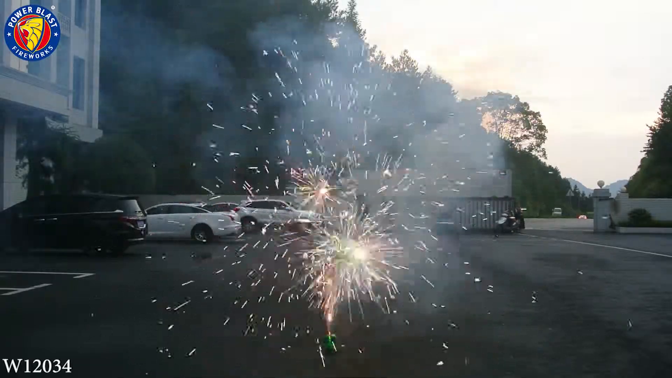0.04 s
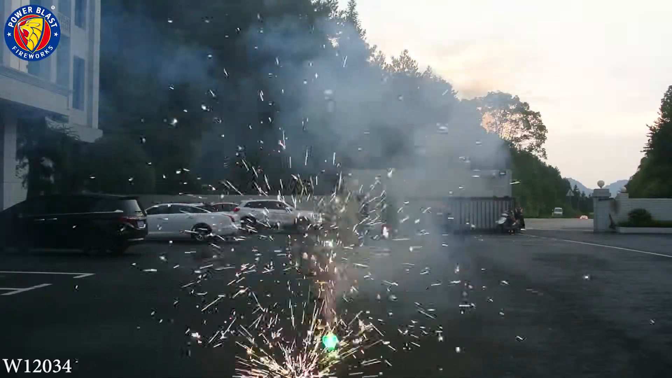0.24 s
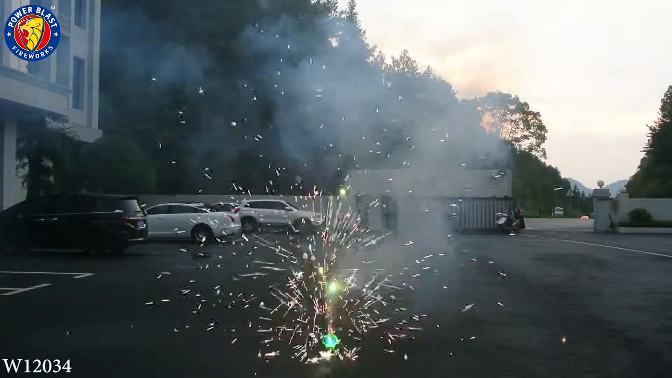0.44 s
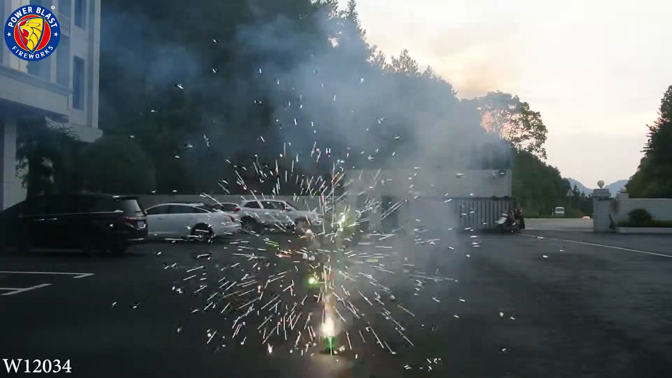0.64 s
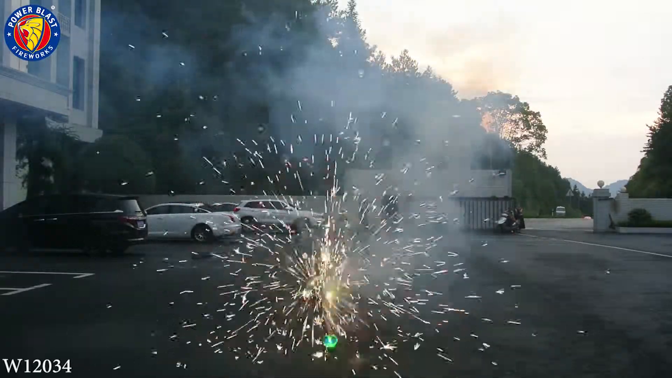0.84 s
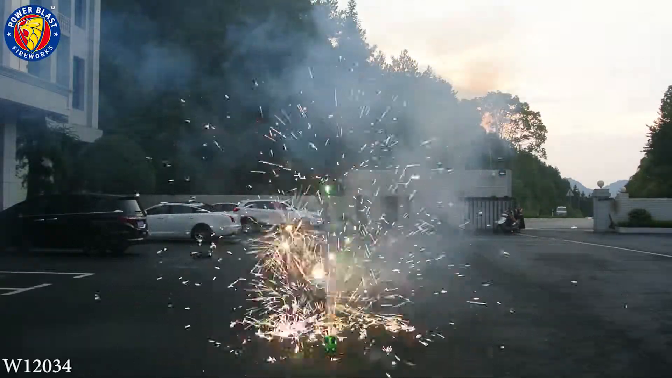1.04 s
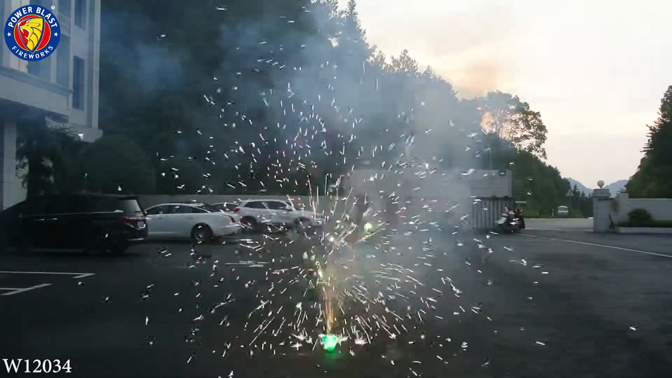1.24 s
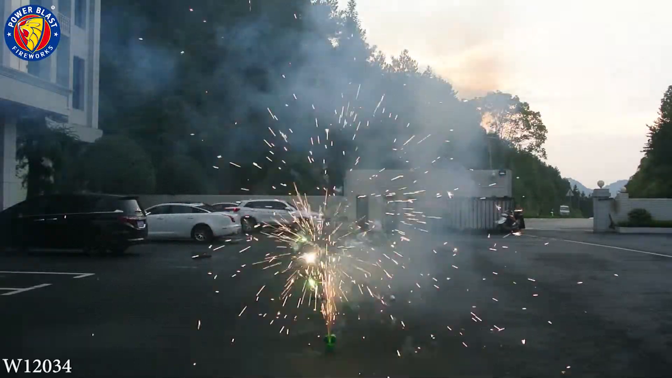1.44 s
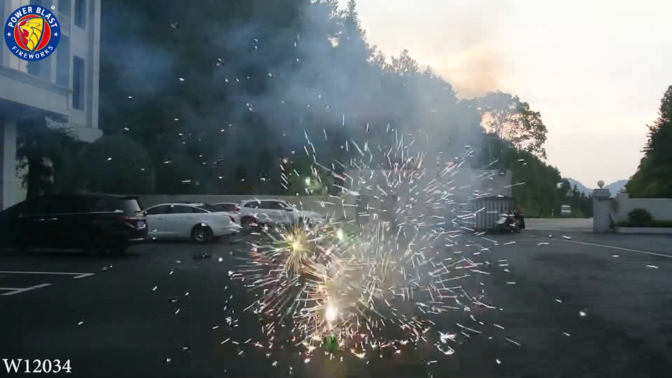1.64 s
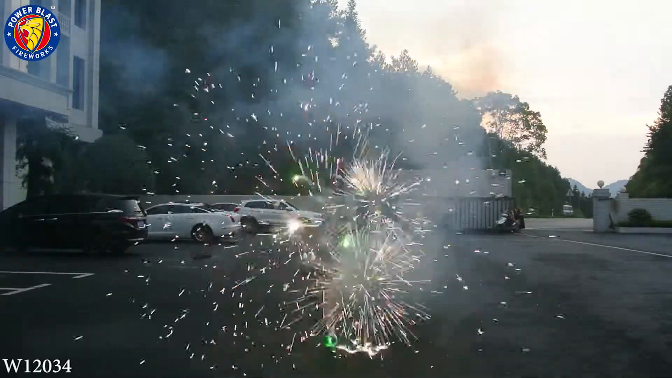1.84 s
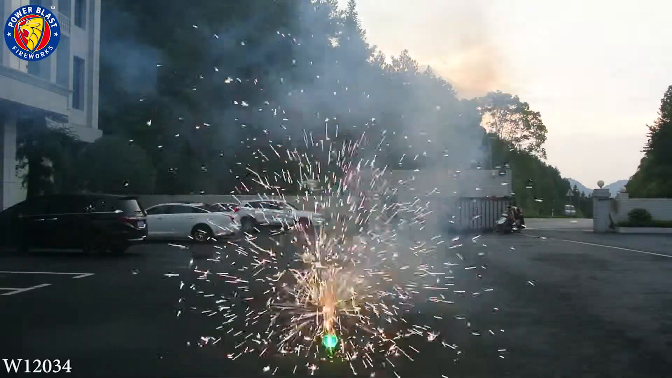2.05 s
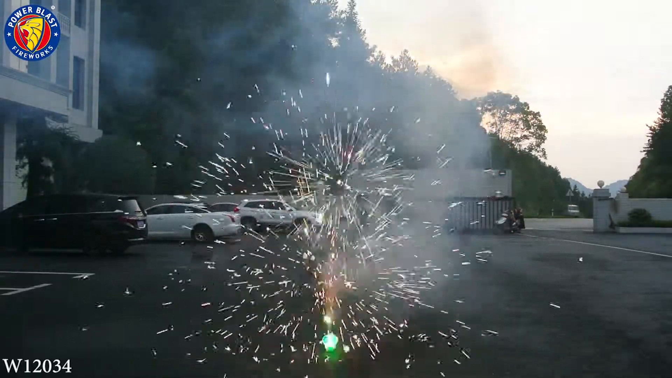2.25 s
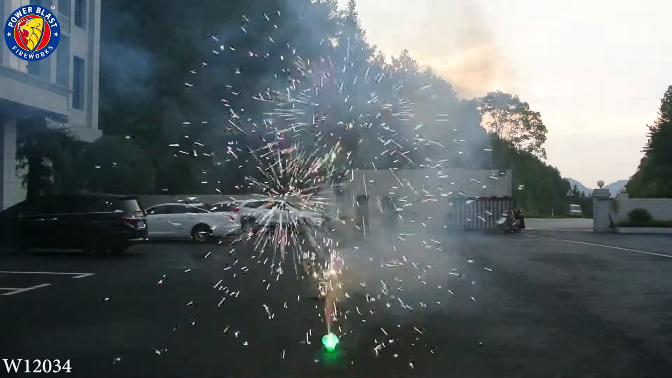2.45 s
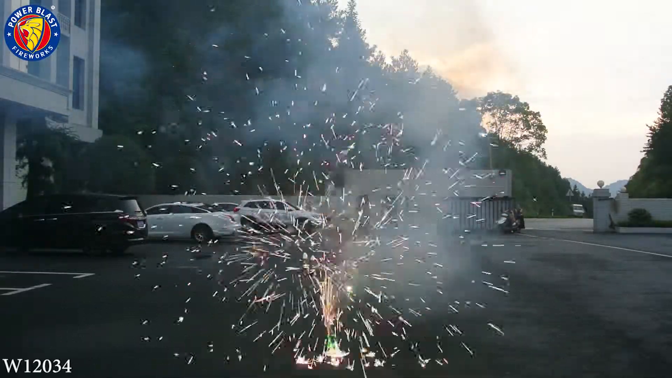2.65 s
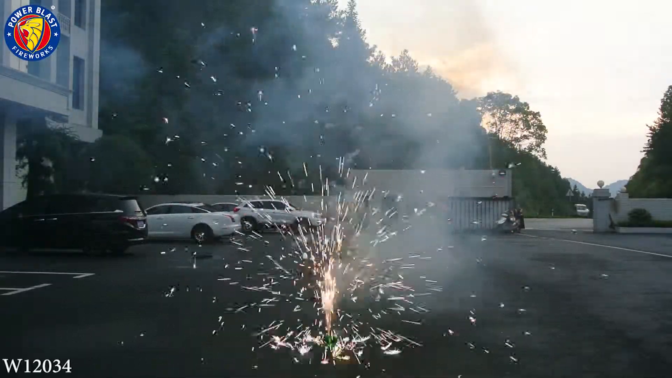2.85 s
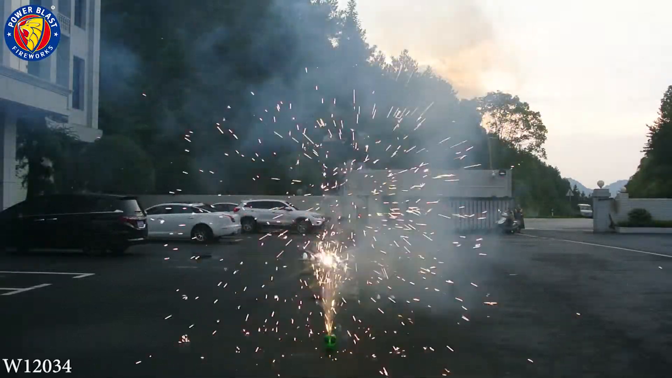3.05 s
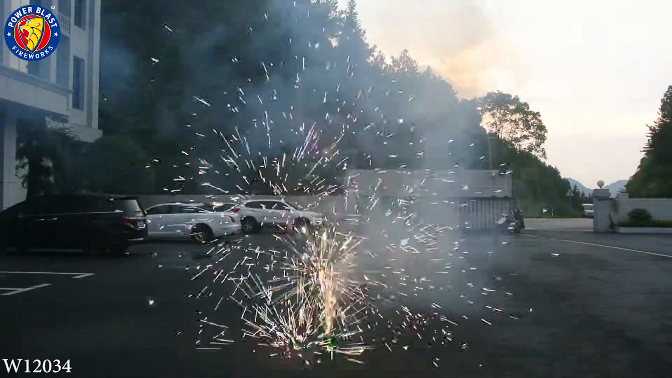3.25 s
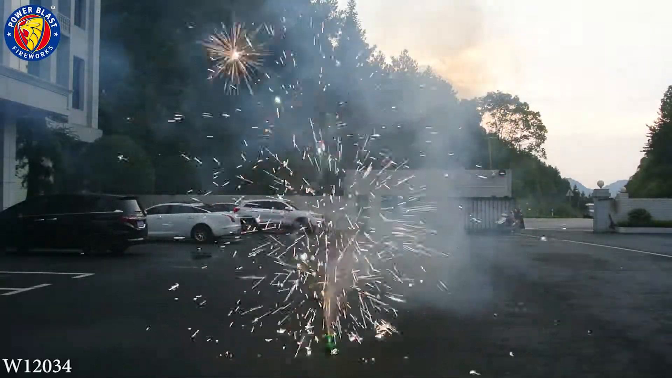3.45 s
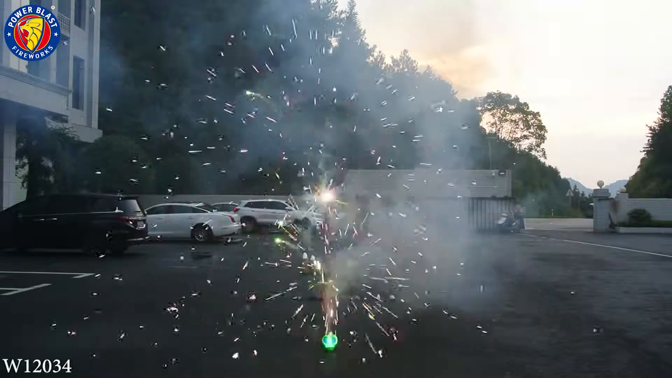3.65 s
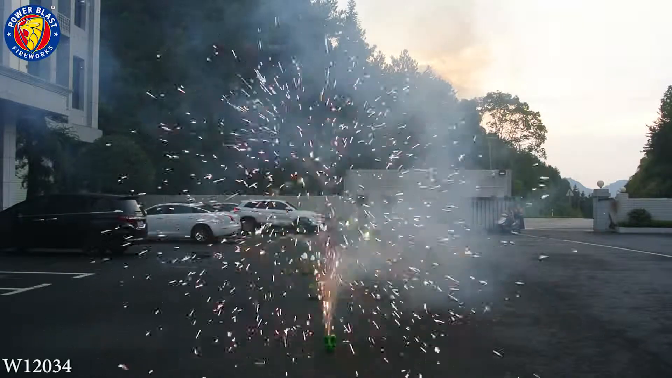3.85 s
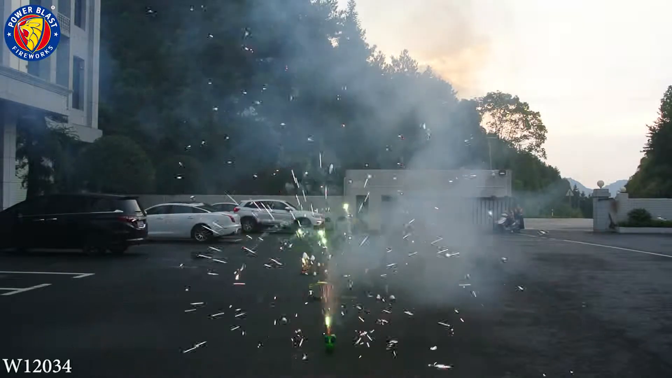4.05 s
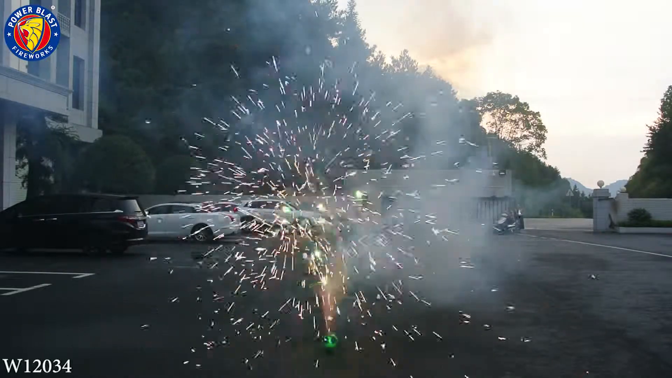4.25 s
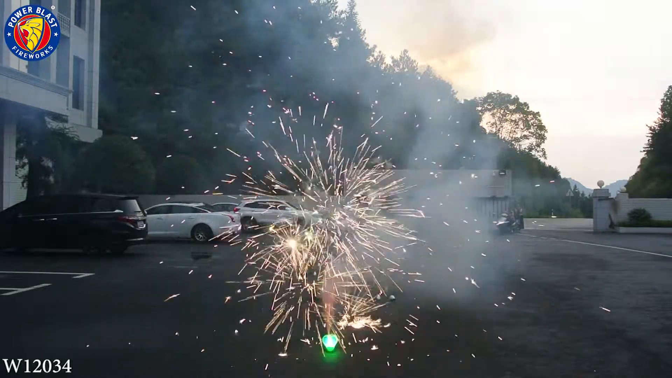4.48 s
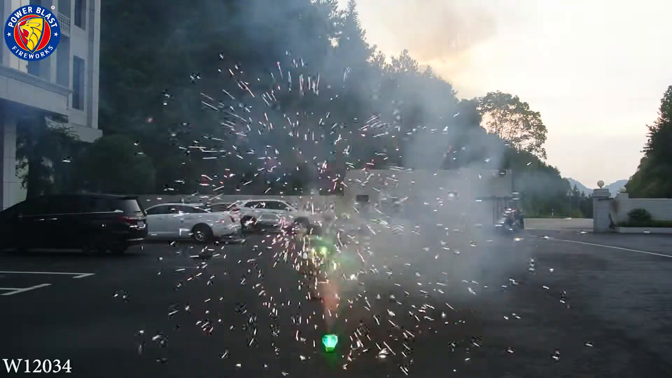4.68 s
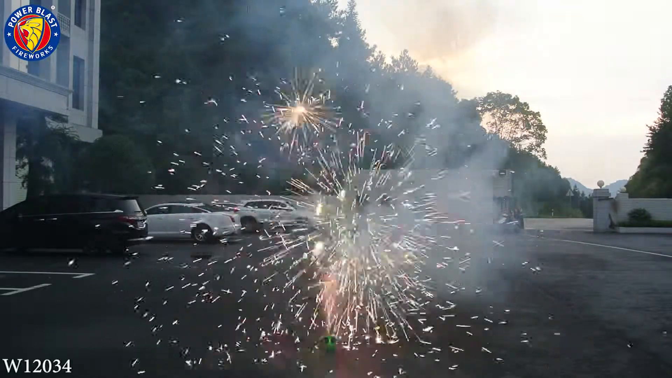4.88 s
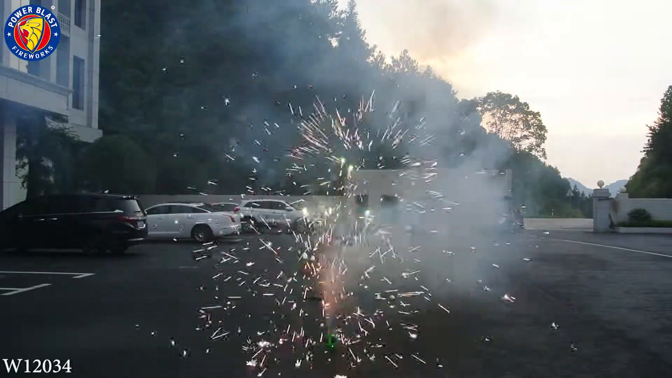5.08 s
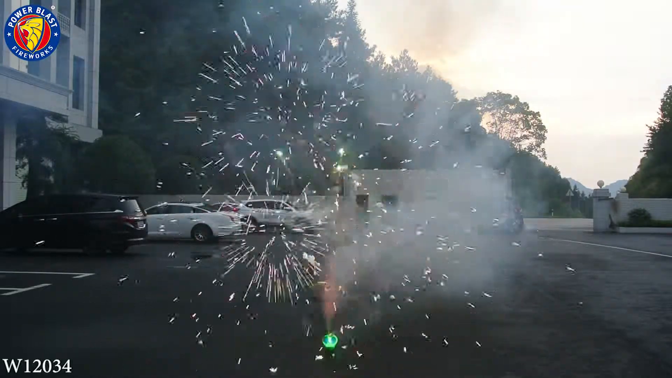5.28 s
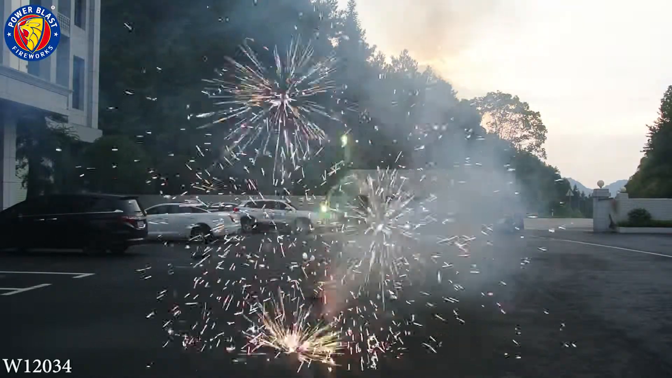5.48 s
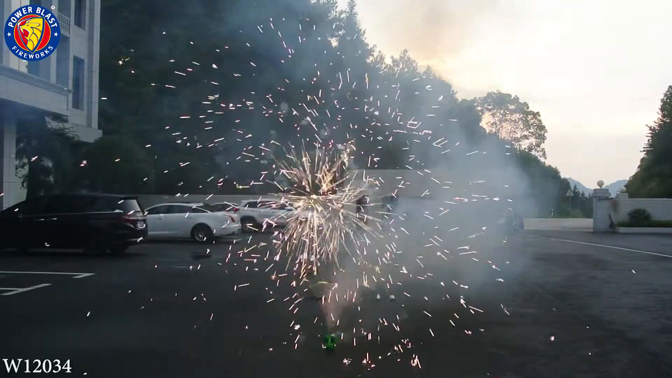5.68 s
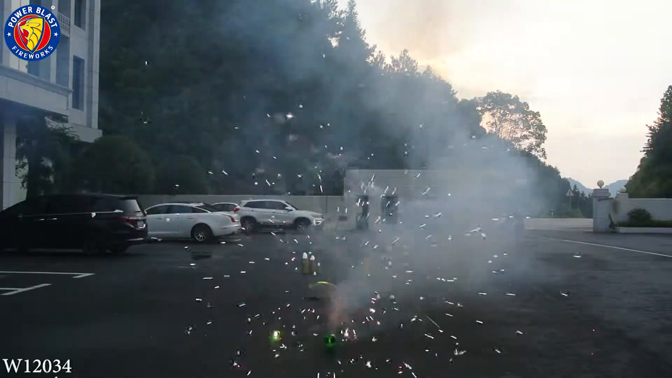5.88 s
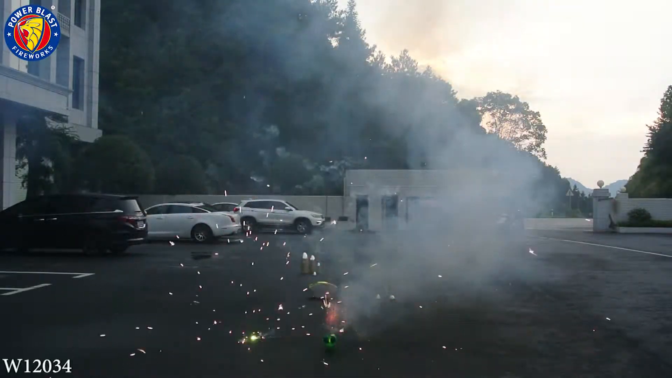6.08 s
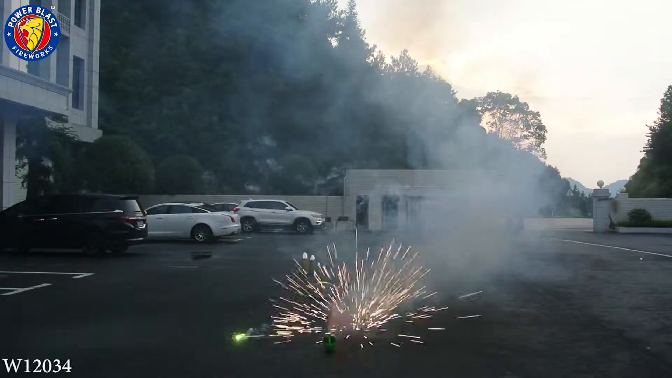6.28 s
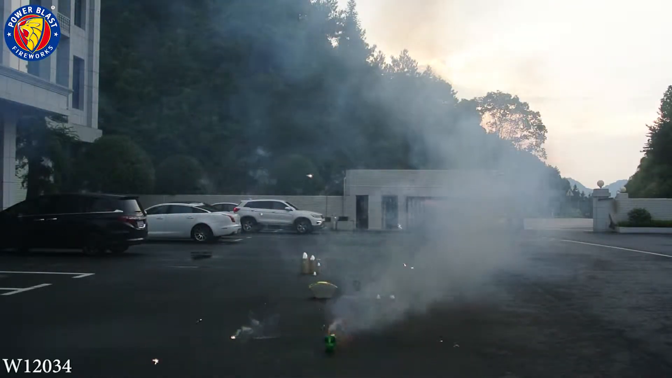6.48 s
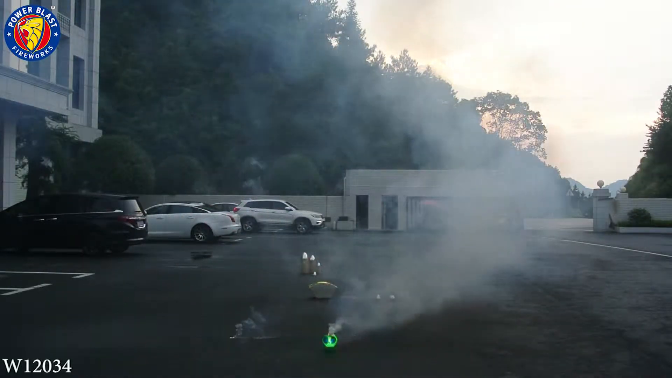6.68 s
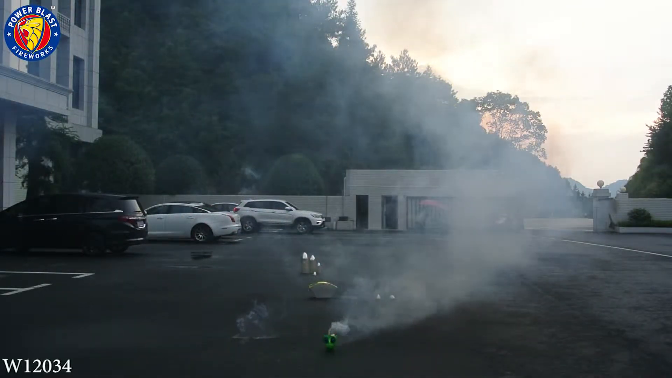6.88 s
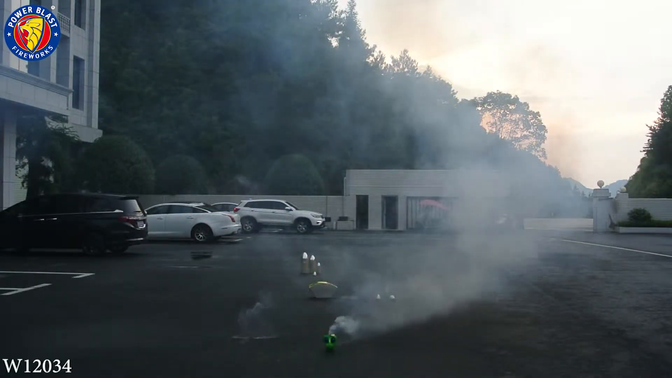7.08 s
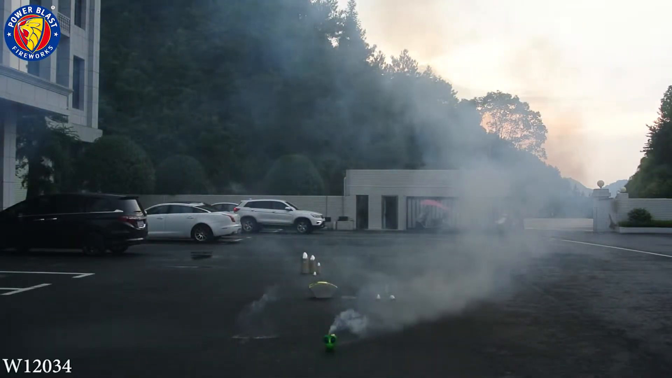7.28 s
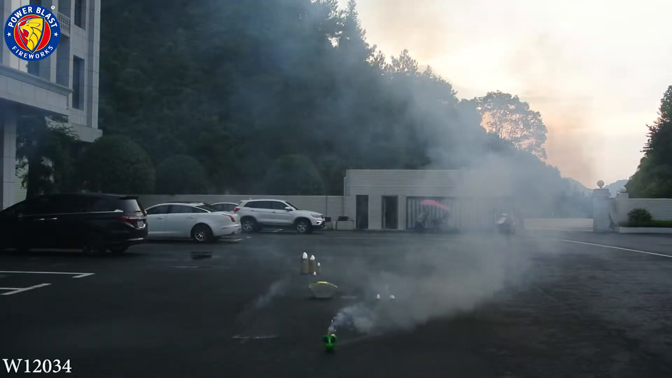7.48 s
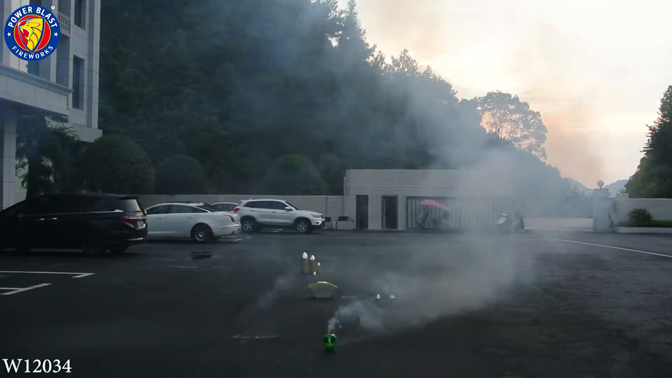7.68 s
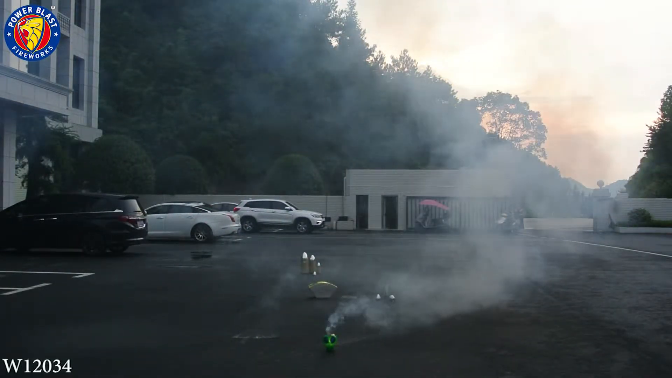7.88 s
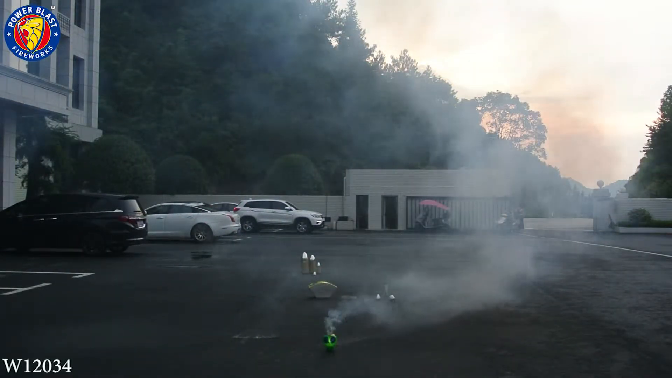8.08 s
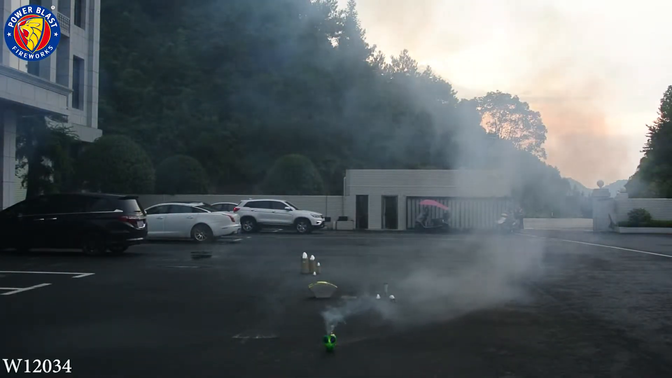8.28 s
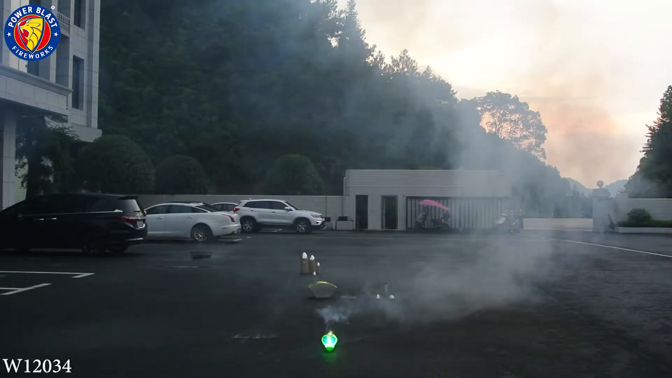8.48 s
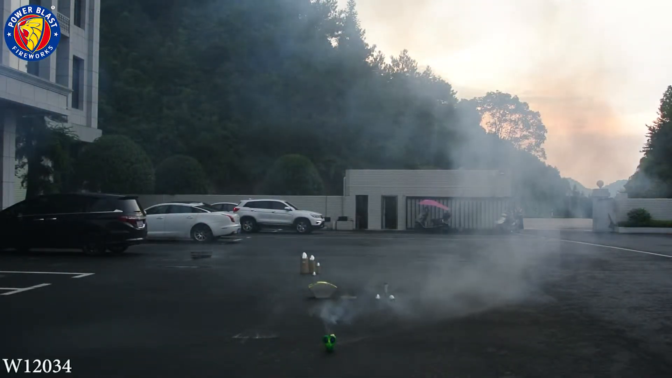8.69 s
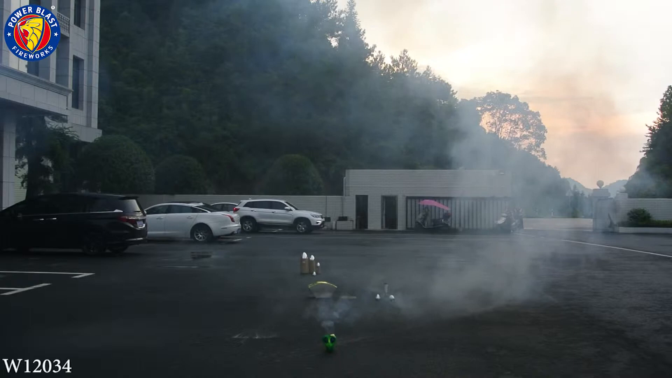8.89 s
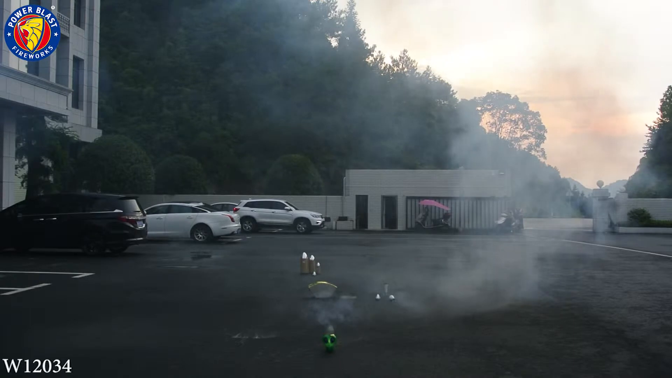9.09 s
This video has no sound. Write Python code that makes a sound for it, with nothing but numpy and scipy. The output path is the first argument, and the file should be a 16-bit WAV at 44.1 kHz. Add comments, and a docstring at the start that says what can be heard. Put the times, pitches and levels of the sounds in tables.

```python
"""Asphalt yard: a ground fountain firework throws stars that crack, over the hiss of its jet; walls answer.
Stars are impulses doubled by a ground bounce, rung through two microphone ports; thin sparks lie between.
Echoes are noise that follows the power of the cracks. After a last bang an insect chirps (clicks into
resonances), a vehicle swells past (shaped noise) and a machine hums (two sines)."""
import sys
import numpy as np
from scipy import signal
from scipy.fft import rfft, irfft, next_fast_len
from scipy.io import wavfile
from scipy.ndimage import map_coordinates

SR = 44100
rng = np.random.default_rng(int(sys.argv[2]) if len(sys.argv) > 2 else 0)


def waveform_to_disk(signal):
    """Save audio, clipped to [-1, 1], as 16-bit WAV at the path in sys.argv[1]."""
    frames = np.transpose(np.atleast_2d(signal))
    scaled = np.clip(frames, -1, 1) * 32767
    samples = np.round(scaled).astype(np.int16)
    wavfile.write(sys.argv[1], SR, samples)


N = 402633

STAR_DB, STAR_SCATTER_DB = -2, 0.78  # all stars sound about equally loud
MIC_HEIGHT_M, DISTANCE_M, SOUND_M_PER_S = 1.2, 8, 343
BURNOUT_S, FADE_DB_PER_S = 6.039, 123  # stragglers after burnout are ever weaker
PAUSE_SWING_DB, PAUSE_S = 2.5, 0.036  # a star after a pause sounds louder than one in a crowd
SPARKS_PER_S, SPARKS_END_S = 260, 6.3
SPARKS_FADE_S, SPARKS_FADE_DB_PER_S = 5.94, 40
HUM_HZ = 74.7
TOP_HZ = 16500


def amp(db):
    """Decibels to amplitude factor."""
    return 10 ** (np.asarray(db) / 20)


def unit(x):
    """x scaled to rms 1."""
    return x / np.sqrt(np.mean(x ** 2) + 1e-20)


def along(points, hz):
    """(Hz, value) points read on a log frequency axis."""
    f, v = np.transpose(points)
    return np.interp(np.log(hz + 1), np.log(f + 1), v)


def curves(rows):
    """One value per sample for each column after the time."""
    s, *cols = np.transpose(rows)
    return [np.interp(np.arange(N) / SR, s, c) for c in cols]


def wobble(knots_per_s):
    """A smooth random curve through Gaussian knots."""
    knots = rng.standard_normal(int(N * knots_per_s / SR) + 4)
    return map_coordinates(knots, [np.arange(N) * knots_per_s / SR])


def filtered(x, response):
    """x times a complex response of frequency."""
    m = next_fast_len(N + SR // 2)
    return irfft(rfft(x, m) * response(np.fft.rfftfreq(m, 1 / SR)), m)[..., :N]


def rush(spectrum, lean):
    """Stereo noise of rms 1; lean scales the colour difference of the ports."""
    # likeness of the two channels: hz, correlation
    likeness = [(60, 0.17), (180, 0.65), (550, 0.9), (1650, 0.17), (4970, -0.18), (15000, 0.23)]
    # colour of the two ports: hz, left_minus_right_db
    port_lean = [(60, -11), (150, -6), (380, -4), (950, -1.5), (2380, 1.5), (5980, 3), (15000, 9.5)]

    def mid_side(hz):
        turn = np.arccos(np.clip(along(likeness, hz), -1, 1)) / 2
        return amp(along(spectrum, hz)) * [np.cos(turn), np.sin(turn)]

    def tilt(hz):
        return amp(np.outer([lean, -lean], along(port_lean, hz)) / 2)

    mid, side = filtered(rng.standard_normal((2, N)), mid_side)
    return unit(filtered(np.array([mid + side, mid - side]), tilt))


def thin(x):
    """Keeps echoes and hiss thin: third-order cut at 220 Hz."""
    return filtered(x, lambda f: (1j * f / (220 + 1j * f)) ** 3)


def spikes(s, size, blunt):
    """Impulses of size (channels x events) at times s; blunt 0-1 spreads each over its neighbours."""
    at = np.clip(np.round(s * SR).astype(int), 1, N - 2)
    taps = [(-1, blunt / 3), (0, 1 - 2 * blunt / 3), (1, blunt / 3)]
    return np.array([sum(np.bincount(at + k, row * share, N) for k, share in taps) for row in size])


def stars():
    """Each star is heard directly and once more off the asphalt; faint thin sparks crackle in between."""
    # star bursts: burst_s, height_m above the asphalt
    bursts = [(0.0017, 0.8), (0.0098, 2.6), (0.0175, 1.5), (0.0548, 2.3), (0.0622, 1.5), (0.0837, 1.6),
              (0.1006, 1.3), (0.1033, 2.0), (0.1079, 1.2), (0.1179, 3.2), (0.1194, 0.9), (0.1248, 1.1),
              (0.129, 1.1), (0.1459, 1.0), (0.1807, 1.9), (0.2218, 3.5), (0.2261, 0.2), (0.2582, 0.5),
              (0.2745, 1.2), (0.2827, 1.1), (0.2873, 0.2), (0.3262, 1.9), (0.4066, 2.0), (0.4164, 1.5),
              (0.4392, 0.4), (0.4861, 0.3), (0.4917, 1.1), (0.5366, 1.7), (0.5478, 1.4), (0.5968, 1.0),
              (0.6081, 1.8), (0.6243, 1.0), (0.6795, 1.3), (0.6893, 1.2), (0.7182, 0.3), (0.7188, 0.8),
              (0.7703, 0.4), (0.8017, 0.6), (0.8043, 2.5), (0.8339, 0.6), (0.8546, 0.3), (0.8552, 0.9),
              (0.8679, 0.6), (0.884, 0.9), (0.9042, 0.9), (0.9447, 1.1), (0.9521, 1.2), (0.9858, 2.0),
              (1.0236, 0.6), (1.0436, 1.4), (1.0604, 0.9), (1.0797, 2.1), (1.0943, 0.6), (1.1061, 1.5),
              (1.1078, 1.3), (1.1171, 1.0), (1.1252, 3.4), (1.1319, 0.3), (1.1324, 0.5), (1.1541, 3.0),
              (1.1674, 1.8), (1.1938, 1.2), (1.2051, 1.7), (1.2253, 0.8), (1.2293, 1.6), (1.2405, 3.8),
              (1.2483, 1.7), (1.2528, 1.3), (1.2904, 0.9), (1.318, 2.3), (1.3854, 0.2), (1.3971, 2.4),
              (1.4285, 1.3), (1.4696, 1.7), (1.4949, 1.2), (1.5166, 1.1), (1.5208, 1.1), (1.5227, 1.0),
              (1.5272, 2.4), (1.5495, 1.7), (1.5546, 2.1), (1.5854, 1.9), (1.5864, 1.6), (1.5965, 0.5),
              (1.6388, 0.8), (1.6528, 0.9), (1.6646, 1.4), (1.6823, 1.8), (1.6898, 0.6), (1.6984, 1.0),
              (1.7071, 1.3), (1.7149, 0.5), (1.7483, 1.3), (1.7627, 2.1), (1.7654, 0.9), (1.7667, 1.2),
              (1.7796, 0.8), (1.7854, 1.7), (1.8239, 0.3), (1.8255, 0.2), (1.8853, 1.5), (1.8988, 3.3),
              (1.9003, 2.3), (1.9128, 1.6), (1.9336, 1.2), (1.9588, 1.0), (1.9686, 1.4), (1.9709, 1.1),
              (1.9721, 1.4), (1.9877, 2.1), (1.9971, 1.9), (2.0318, 0.4), (2.0408, 0.6), (2.0616, 0.9),
              (2.0687, 0.9), (2.0702, 1.1), (2.0744, 0.9), (2.079, 1.5), (2.1049, 1.8), (2.1058, 1.3),
              (2.1242, 0.3), (2.1246, 2.1), (2.1277, 0.2), (2.167, 1.3), (2.1683, 1.1), (2.1863, 1.3),
              (2.2316, 1.6), (2.2479, 0.9), (2.2505, 2.4), (2.252, 1.6), (2.2835, 1.0), (2.2988, 2.1),
              (2.341, 1.0), (2.3445, 1.8), (2.3585, 1.5), (2.3669, 1.9), (2.4191, 3.4), (2.4237, 0.2),
              (2.4307, 2.7), (2.4544, 1.3), (2.4564, 1.9), (2.4837, 2.9), (2.5004, 1.9), (2.5233, 3.3),
              (2.5735, 1.8), (2.5963, 2.4), (2.5974, 2.5), (2.6256, 2.2), (2.6262, 2.4), (2.629, 0.5),
              (2.6674, 1.4), (2.6854, 1.2), (2.697, 1.3), (2.731, 1.8), (2.7329, 2.2), (2.7651, 1.2),
              (2.7797, 0.4), (2.7868, 1.7), (2.7891, 1.7), (2.8709, 1.0), (2.8763, 1.0), (2.8927, 0.6),
              (2.9434, 1.0), (2.9973, 1.3), (3.0002, 0.6), (3.0016, 1.7), (3.0257, 1.3), (3.0432, 1.6),
              (3.0728, 2.0), (3.1155, 1.1), (3.1711, 0.9), (3.1879, 1.5), (3.2003, 0.4), (3.2018, 0.8),
              (3.2138, 1.7), (3.2312, 1.5), (3.2385, 0.8), (3.2614, 2.3), (3.2717, 1.0), (3.2822, 1.7),
              (3.2955, 0.2), (3.3049, 1.0), (3.3218, 3.0), (3.4013, 0.6), (3.4298, 2.6), (3.4546, 0.9),
              (3.4566, 0.4), (3.489, 1.7), (3.4945, 0.8), (3.5045, 3.5), (3.5201, 1.8), (3.5735, 0.4),
              (3.5824, 2.3), (3.5949, 1.8), (3.6019, 0.6), (3.6551, 2.5), (3.6912, 1.0), (3.7133, 1.9),
              (3.7241, 1.2), (3.7302, 3.6), (3.7366, 0.8), (3.738, 0.2), (3.7456, 3.0), (3.7465, 3.7),
              (3.7676, 1.4), (3.789, 1.9), (3.7939, 2.0), (3.8019, 1.5), (3.8262, 1.4), (3.841, 0.5),
              (3.8417, 1.8), (3.8542, 1.5), (3.8684, 2.4), (3.9402, 2.1), (3.9601, 2.2), (3.9651, 1.7),
              (4.0744, 0.8), (4.1588, 2.2), (4.2018, 1.1), (4.2072, 0.4), (4.2188, 1.5), (4.2224, 2.5),
              (4.26, 2.1), (4.2645, 0.9), (4.2658, 0.6), (4.2675, 0.2), (4.2871, 1.8), (4.351, 1.2),
              (4.3806, 1.3), (4.3898, 2.5), (4.3964, 1.6), (4.4091, 1.5), (4.4264, 2.6), (4.5045, 1.0),
              (4.5107, 2.0), (4.5166, 1.7), (4.5313, 1.8), (4.5372, 0.9), (4.5449, 1.6), (4.5745, 1.1),
              (4.583, 1.3), (4.5901, 1.2), (4.6019, 0.7), (4.6214, 1.6), (4.6233, 1.0), (4.6254, 0.2),
              (4.6418, 2.2), (4.6573, 1.6), (4.6581, 1.6), (4.6653, 0.2), (4.6671, 0.2), (4.688, 1.3),
              (4.7129, 2.5), (4.7615, 2.5), (4.784, 2.7), (4.7958, 1.8), (4.8033, 1.5), (4.8434, 1.6),
              (4.8471, 2.9), (4.8617, 1.6), (4.8662, 1.2), (4.8693, 1.6), (4.8744, 2.7), (4.8861, 1.5),
              (4.9043, 0.3), (4.9206, 1.7), (4.9292, 1.7), (4.9402, 0.6), (4.941, 0.6), (4.9543, 1.5),
              (4.9559, 0.6), (4.9571, 0.2), (5.0162, 0.2), (5.0349, 1.2), (5.0663, 1.8), (5.0975, 1.7),
              (5.1165, 2.2), (5.119, 0.2), (5.1648, 3.3), (5.178, 0.2), (5.1798, 0.6), (5.2112, 2.1),
              (5.261, 1.5), (5.2659, 1.7), (5.3104, 2.9), (5.3329, 1.3), (5.3712, 3.0), (5.3724, 3.1),
              (5.3762, 0.2), (5.4176, 2.3), (5.425, 2.0), (5.4383, 1.6), (5.4385, 1.7), (5.4487, 2.7),
              (5.4595, 2.2), (5.4902, 1.2), (5.4938, 3.1), (5.4947, 2.6), (5.5171, 1.7), (5.5324, 3.2),
              (5.5401, 1.6), (5.544, 1.3), (5.5878, 1.5), (5.6091, 2.6), (5.6169, 2.0), (5.6278, 2.8),
              (5.668, 1.7), (5.6805, 2.3), (5.684, 2.9), (5.7044, 1.1), (5.706, 2.0), (5.738, 1.0),
              (5.7397, 0.8), (5.8093, 1.3), (5.8283, 1.2), (5.8541, 0.9), (5.8918, 0.8), (5.9678, 0.5),
              (6.0509, 0.1), (6.1198, 0.1), (6.1923, 0.1)]
    # heavy thumps: thump_s, level_db
    heavy = [(.129, -11), (0.439, -15.5), (1.43, -3.5), (1.823, -13), (2.249, -1), (2.876, -7), (3.028, -7),
             (3.295, 1.5), (3.841, -7), (4.265, -7), (4.851, 3), (5.54, 2.5), (5.969, -5)]
    s, height_m = np.transpose(bursts)
    jitter = rng.random((len(s), 2)).T - .5
    s, height_m = s + .0001 * jitter[0], height_m + .1 * jitter[1]
    bounce_s = 2 * height_m * MIC_HEIGHT_M / DISTANCE_M / SOUND_M_PER_S

    draw = rng.standard_normal((len(s), 8)).T
    db = STAR_DB + STAR_SCATTER_DB * draw[7] - FADE_DB_PER_S * np.maximum(s - BURNOUT_S, 0)
    db += PAUSE_SWING_DB * (.5 - np.exp(-np.diff(s, prepend=0) / PAUSE_S))
    size = amp(db + 0.24 * draw[:4])
    blunt = np.clip(0.038 + 0.13 * draw[4:6], 0, 1)
    direct = spikes(s, size[:2], blunt[0])
    bounced = spikes(s + bounce_s, size[2:], blunt[1])

    sparks = rng.random((round(SPARKS_PER_S * SPARKS_END_S), 3))
    spark_s = SPARKS_END_S * sparks[:, 0]
    faint = np.minimum(amp(-21 - 2.8 * np.log(sparks[:, 1])), amp(-1.5))
    faint *= amp(-SPARKS_FADE_DB_PER_S * np.maximum(spark_s - SPARKS_FADE_S, 0))
    pan = amp(np.outer([1, -1], 6 * (sparks[:, 2] - .5)))
    crackle = filtered(spikes(spark_s, faint * pan, 0), lambda f: 1j * f / (6000 + 1j * f))

    # a slower low thump goes with each burst, strong in the heaviest ones
    heavy_s, heavy_db = np.transpose(heavy)
    thumps = spikes(s, [amp(db - 15.0 + 5.2 * draw[6])] * 2, 0)
    thumps += spikes(heavy_s, [amp(heavy_db)] * 2, 0)
    thumps = filtered(thumps, lambda f: 1j * f / (90 + 1j * f) / (1 + 1j * f / 700))
    return direct + bounced + crackle, thumps


def bang():
    """The last bang, louder than the stars: a crack, a long push, single echoes, some brighter, late ones dull."""
    # the bang: burst_s, level_db, push_db re level
    (s, db, push_db), = [(6.32834, -1.5, -4)]
    # answers from ground, cars and walls: arrival_s, level_db, left_minus_right_db, treble_limit_hz
    slaps = [(6.3304, -11, -15, 6000), (6.333, -18, -10, 5000), (6.3429, -19, -8, 14810),
             (6.357, -24, 0, 9000), (6.403, -29, 8, 8000), (6.4127, -29, 6, 2778), (6.5072, -9.5, -6, 1910),
             (6.512, -13, 8, 1900)]
    arrivals = [(s, 0, 0, 6000)] + slaps  # direct sound first

    def echo(f):
        total = 0
        for at, slap_db, pan_db, top_hz in arrivals:
            level = amp(db + 15.5 + slap_db + np.array([[.5], [-.5]]) * pan_db)
            delay = np.exp(-2j * np.pi * f * (at - s))
            total = total + level / (1 + 1j * f / top_hz) ** 2 * delay
        return total

    crack = spikes(np.array([s]), np.ones((2, 1)), 0)
    t = np.maximum(np.arange(N) / SR - s, 0)
    u = t / np.array([[.0006], [.00035]])  # left and right time scales, s
    push = amp(db + push_db) * (t > 0) * (1 - .7 * u) * np.exp(-.7 * u)
    return crack, filtered(crack, echo), push


def shock(x):
    """A tiny blast: a spike and its slower suction, ringing in each microphone port."""
    # ports, left and right: resonance_hz, q, low_corner_hz, low_q, treble_slope_start_hz, level_db
    ports = [(11450, 4.9, 1010, 0.28, 2570, 6), (10260, 1.8, 3030, 0.93, 596, 18.5)]

    def port(f, hz, q, low, low_q, slope, db):
        suction = f * f / (low * low - f * f + 1j * f * low / low_q)
        ring = 1 / (1 - (f / hz) ** 2 + 1j * f / hz / q)
        return amp(db) * suction * ring / (1 + 1j * f / slope)

    return filtered(x, lambda f: [port(f, *row) for row in ports])


def yard(power, near_db, bright):
    """Scattered echoes: fresh noise whose power follows every crack along each part of the yard's answer."""
    # parts of the answer, nearest first: delay_ms, rise_ms, t60_s, level_db, treble_limit_hz (times bright)
    parts = [(0.302, 0.13, 0.026, -7.5, 12600), (12, 4.1, 0.24, -17, 28000), (74, 3.1, 0.26, -11.5, 20600),
             (117, 18, 1.15, -17, 13400)]
    # echo colour: hz, level_db per Hz
    colour = [(59, -66), (100, -48), (141, -21), (262, -10.5), (1990, -5.5), (2920, -6.5), (13000, -4),
              (15100, -14), (16500, -81)]
    t = np.arange(2 * SR) / SR
    out = 0
    for k, (delay_ms, rise_ms, t60_s, db, top_hz) in enumerate(parts):
        late = np.maximum(t - delay_ms / 1000, 0)
        shape = (1 - np.exp(-late * 1000 / rise_ms)) * amp(-120 * late / t60_s)  # power
        answer = signal.fftconvolve(power, shape / shape.sum())[:N]
        noise = rush(colour, lean=0.8)
        noise = unit(filtered(noise, lambda f: 1 / (1 + 1j * f / (bright * top_hz)) ** 2))
        out = out + amp(db + near_db * (k == 0)) * np.sqrt(np.abs(answer)) * noise
    # the answers come from separate surfaces, so they arrive in lumps
    lumps_db = 1.8 * wobble(300) + 2.5 * wobble(2000)
    return thin(out * unit(amp(lumps_db)))


def jet():
    """Burning powder hisses out of the tube, fluttering."""
    # hiss: time_s, level_db
    hiss = [(0, -44.5), (2, -38.5), (4.1, -44.5), (5.7, -42.5), (6.2, -49.5), (6.6, -65), (7.0, -81)]
    # colour: hz, level_db per Hz
    colour = [(180, -44), (300, -34), (539, 0), (1660, -3), (2570, 8), (5280, 4.5), (11600, 0),
              (15200, 1.5), (16500, -35)]
    hiss_db, = curves(hiss)
    flutter_db = 1.5 * wobble(12) + 2 * wobble(150)
    return thin(amp(hiss_db + flutter_db) * rush(colour, lean=1.0))


def insect():
    """Wing strokes: uneven fast clicks into the wing's resonances, swelling and falling."""
    # chirps: middle_s, level_db, half_length_s
    chirps = [(6.84, -58, 0.012), (7.062, -57, 0.018), (7.258, -50, 0.014), (7.474, -46.5, 0.019),
              (7.644, -44.5, 0.017), (7.86, -42, 0.023), (8.089, -35.5, 0.024), (8.295, -33.5, 0.021),
              (8.548, -34, 0.026), (8.79, -35, 0.022), (9.08, -37, 0.032)]
    # wing resonances: resonance_hz, width_hz, relative_level_db
    resonances = [(6480, 510, 2.5), (8400, 920, 0.5), (10500, 570, 2.5), (11800, 600, 2), (12900, 700, 1.5),
                  (14700, 500, -4)]
    t = np.arange(N) / SR
    swell = sum(amp(db) * np.exp(-np.abs((t - s) / half_s) ** 1.4) for s, db, half_s in chirps)
    clicks = rng.random(N) < 1500 / SR  # 1500 a second on average
    teeth = rng.standard_normal((2, N)) * (.25 + clicks * 3)

    def wing(f):
        return sum((-1) ** k * amp(db) * 1j * f * w / (hz * hz - f * f + 1j * f * w)
                   for k, (hz, w, db) in enumerate(resonances))

    return swell * unit(filtered(teeth, wing))


def street():
    """Vehicle and machine: tyre roar, air hiss and a wavering hum come up once the fountain is silent."""
    # vehicle: time_s, tyre_db, air_hiss_db
    passing = [(6.35, -69, -57), (6.6, -60.5, -50), (7.0, -60, -57), (7.4, -52.5, -53.5),
               (7.8, -41.5, -45.5), (8.2, -31.5, -38), (8.35, -32, -37), (8.7, -37.5, -39),
               (9.13, -39.5, -40)]
    # tyre colour: hz, level_db per Hz
    tyre_colour = [(20, -10), (65, -12), (140, -6), (360, -3), (700, -1.5), (1300, -1.5), (1900, -16.5),
                   (2400, -19), (3000, -34), (5000, -19), (9000, -58)]
    # air colour: hz, level_db per Hz
    air_colour = [(880, -33), (1500, -3), (2870, -8.5), (6000, -13), (11400, -16.5), (13500, -21.5),
                  (14800, -32), (15500, -74)]
    # machine: time_s, level_db
    hum_levels = [(6.55, -88), (6.68, -70), (6.86, -82), (6.98, -67.5), (7.15, -70), (7.22, -78),
                  (7.4, -58.5), (7.9, -54), (8.37, -47), (8.58, -58), (8.75, -48), (9.13, -44.5)]
    tyre_db, air_db = curves(passing)
    flutter_db = .7 * wobble(8) + 1.2 * wobble(40)
    roar = amp(tyre_db + flutter_db) * rush(tyre_colour, lean=0.16)
    air = amp(air_db + 1.1 * wobble(15)) * rush(air_colour, lean=-0.05)
    hum_db, = curves(hum_levels)
    phase = 2 * np.pi * HUM_HZ * np.arange(N) / SR
    hum = amp(hum_db) * (np.sin(phase) + amp(-8.5) * np.sin(2 * phase))
    return roar + air + hum


def scene():
    """Cracks through the ports, plus thumps, push, echoes and background."""
    crackle, thumps = stars()
    crack, last, push = bang()
    echoes = yard(np.mean(crackle ** 2, axis=0), near_db=2.5, bright=1)
    # the bang's echoes are duller, with very little tail right after the crack
    echoes += yard((amp(12.5) * crack[0]) ** 2, near_db=-28, bright=0.37)
    return shock(crackle + last) + thumps + push + echoes + jet() + insect() + street()


def record(dry):
    """Peaks round off near full scale; the treble rolls off and ends at TOP_HZ."""
    soft = dry / (1 + np.abs(dry / .9) ** 6) ** (1 / 6)
    return filtered(soft, lambda hz: (hz < TOP_HZ) / np.sqrt(1 + (hz / 15300) ** 24))


dry = scene()
out = record(dry)
waveform_to_disk(out)
```